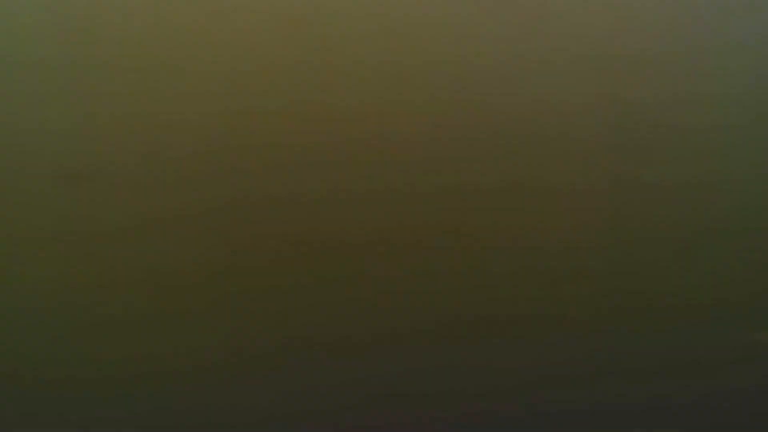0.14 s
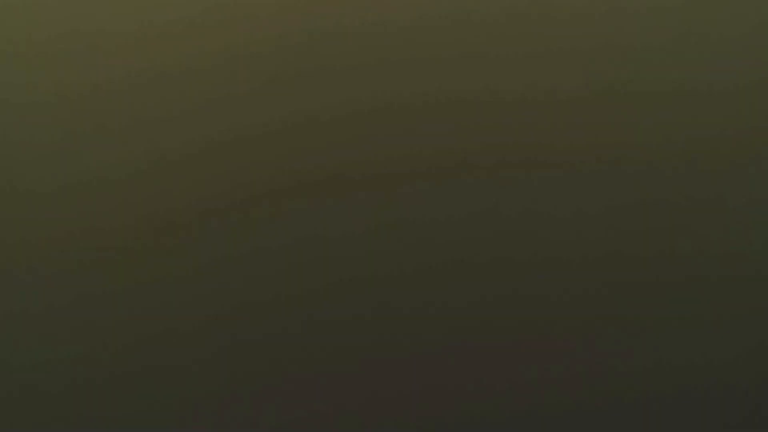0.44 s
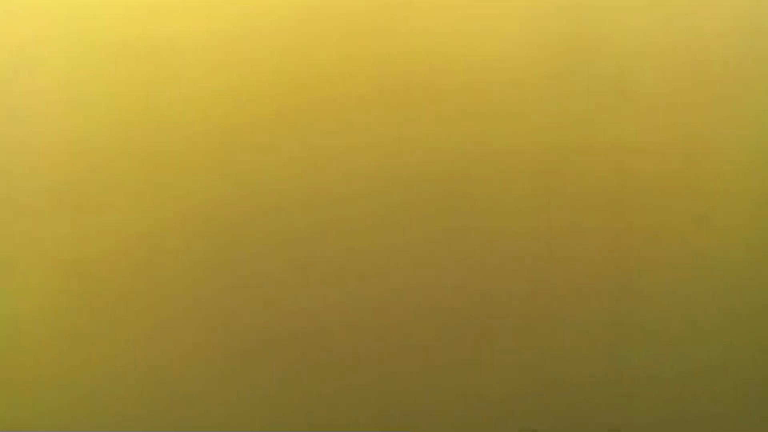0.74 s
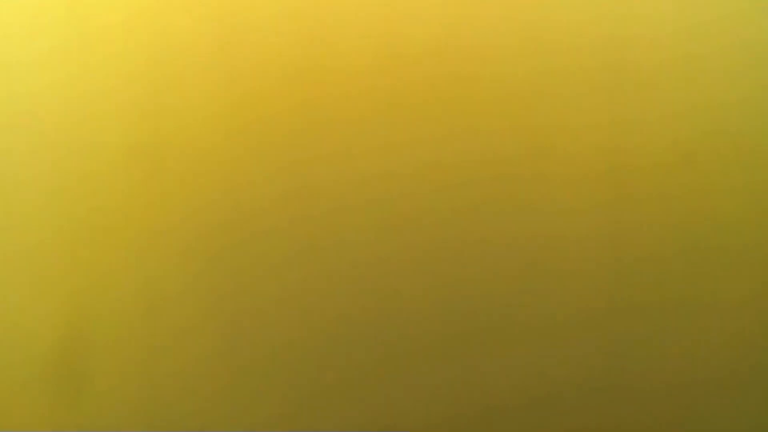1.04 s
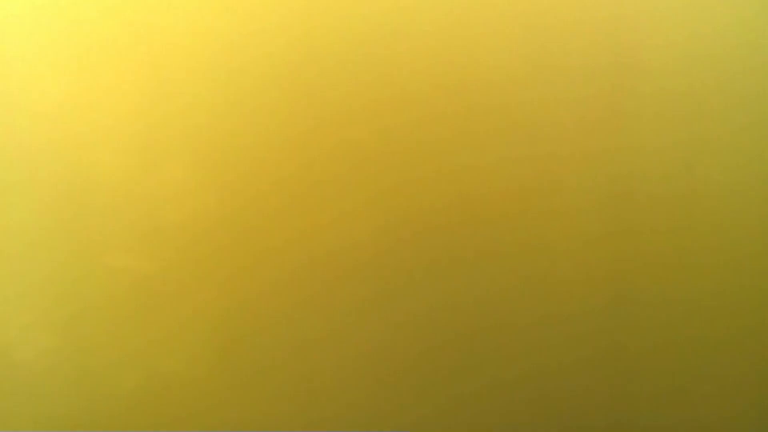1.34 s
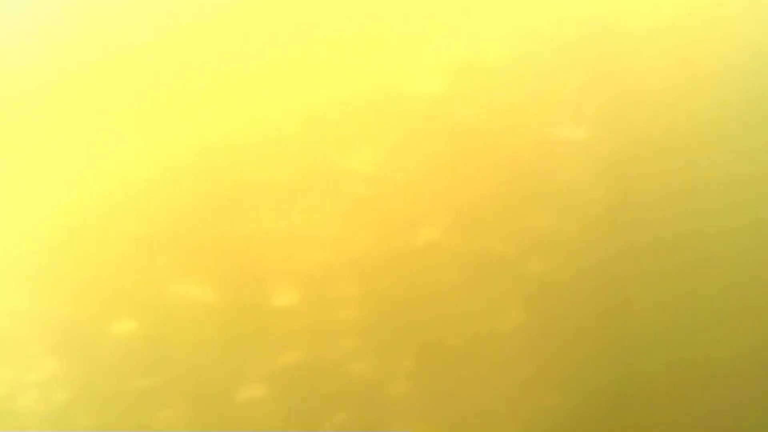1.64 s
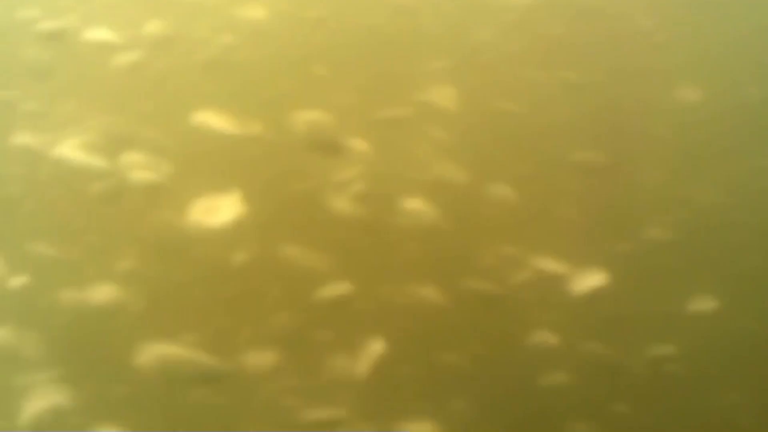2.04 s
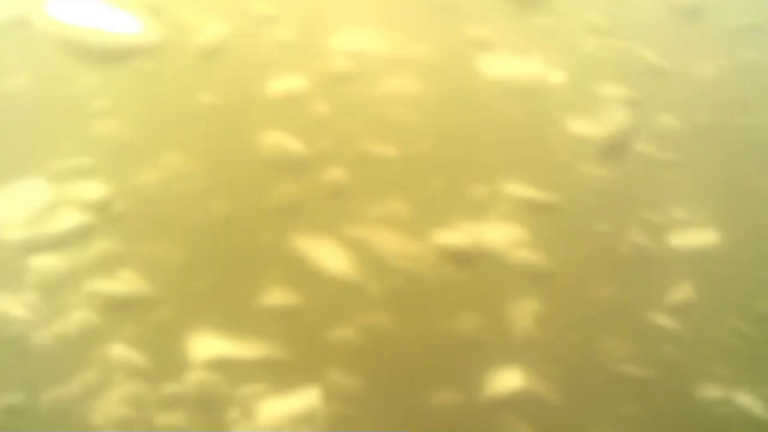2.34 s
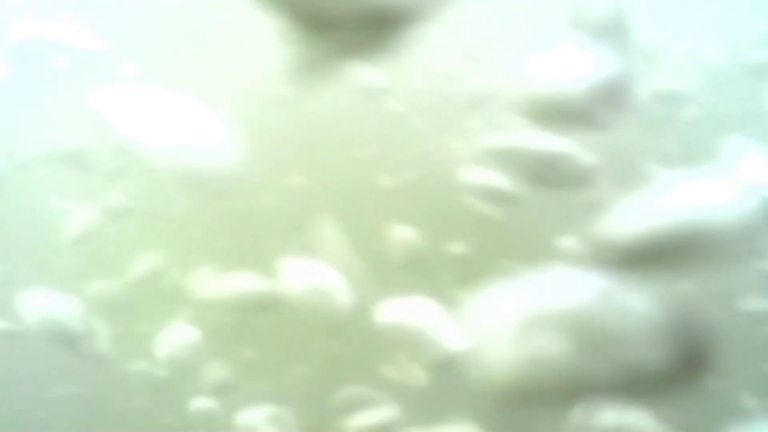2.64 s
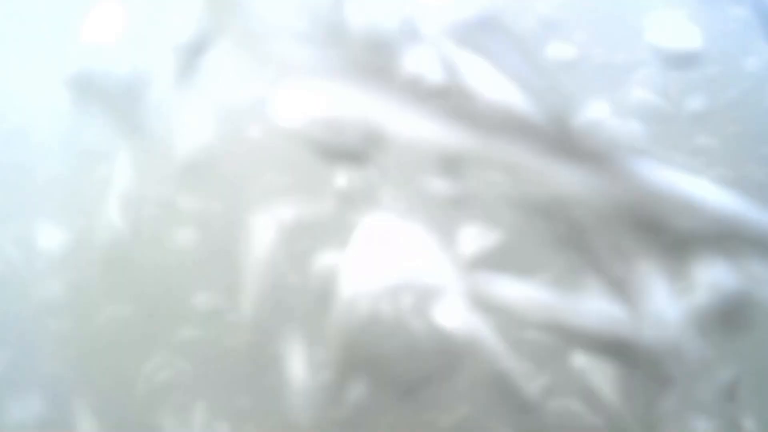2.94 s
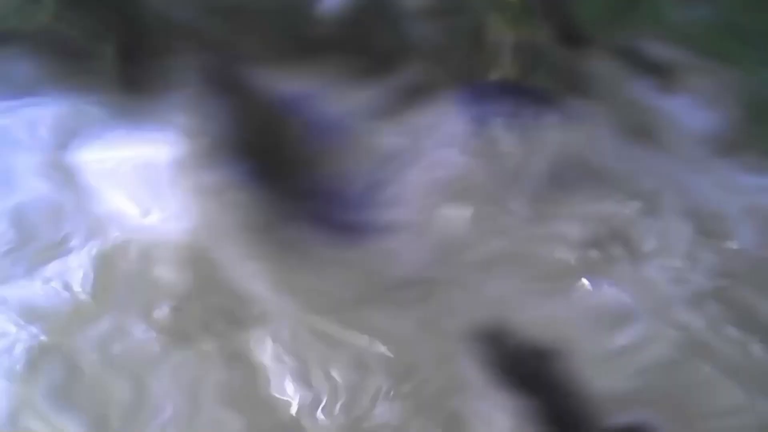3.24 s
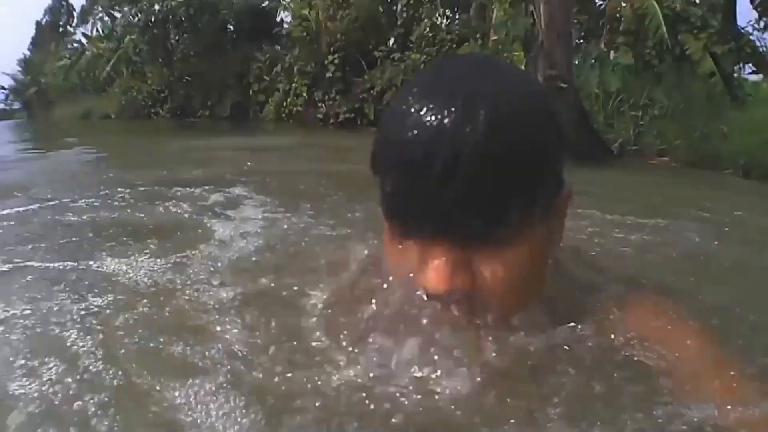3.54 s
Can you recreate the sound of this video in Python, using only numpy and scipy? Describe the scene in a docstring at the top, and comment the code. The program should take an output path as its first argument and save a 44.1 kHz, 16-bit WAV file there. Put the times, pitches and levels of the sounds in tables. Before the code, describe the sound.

A loud, distorted splash hits a waterproof camera as a swimmer plunges into a pond. Fizzing bubbles give way to muffled underwater churning and gurgles, then the microphone surfaces with a hollow glug, trickling water and plinking drops.

```python
"""Water slaps a waterproof camera case as a swimmer plunges into a pond, overloading the microphone.
A cloud of ringing bubbles fizzes out; below the surface come muffled churning and gulps of air.
Water wells up, the case surfaces with a hollow glug, and wavelets knock it. Drops tick on it and
ring the bubbles they trap while the water runs off. A faint hiss lies under it all."""
import sys
import numpy as np
from scipy import signal
from scipy.fft import rfft, irfft, next_fast_len
from scipy.io import wavfile

SR = 44100
rng = np.random.default_rng(int(sys.argv[2]) if len(sys.argv) > 2 else 0)


def store_wav(level_fs):
    """Save 16-bit WAV to argv[1]."""
    pcm = np.round(np.clip(np.atleast_2d(level_fs), -1, 1) * 32767)
    wavfile.write(sys.argv[1], SR, pcm.T.astype(np.int16))


N = 163170
TIME = np.arange(N) / SR
PLUNGE_S, GLUG_S, SURFACE_S = 0.082, 3.138, 3.19

# slaps of water, ahead of the case resonances: t/s, level/dB, length/s, centre f/Hz
SLAPS = [(0.0948, 5, .013, 1375), (.111, -10, 0.011, 1500), (.128, -2, 0.0041, 1050),
         (.143, -12, 0.0049, 1500), (.155, -8, .012, 800), (.197, -5, .014, 2100), (.204, -9.5, .011, 4200),
         (.216, -11, .016, 1200), (.232, -18, .014, 2800), (0.257, -13, 0.0015, 2500),
         (0.289, -12.5, 0.0043, 1100), (.332, -3.5, 0.0064, 884), (.351, -12.5, 0.0037, 1280),
         (.367, -12.5, 0.016, 660), (.403, -9.5, .008, 700), (0.455, -12, 0.0055, 1200),
         (.472, -6, 0.0026, 1460), (.490, -9, 0.0055, 1300)]
# the rush of water shoves the case: t/s, level/dB, length/s, f/Hz
SURGES = [(0.0868, 6.5, .028, 84.5), (0.101, -12, 0.15, 25.7), (0.282, -3.5, 0.08, 34.3),
          (.297, 8.5, .06, 126.8), (.39, -5, 0.056, 258.3)]
# resonances of the hollow case: f/Hz, width/Hz, gain/dB
CASE_MODES = [(840, 86, -0.5), (2000, 300, -9)]
# the churning ebbs as the case drifts upward: t/s, gain/dB
EBB = [(1.78, 0.5), (1.85, -2.5), (2.45, -2.5), (2.56, -4.5), (2.8, -1)]
# large pockets of air: t/s, level/dB, f/Hz
GULPS = [(.455, -11, 135), (0.548, -15, 107.6), (.675, -9, 340.6), (.815, -18.5, 178.6),
         (0.818, -14, 311.6), (1.435, -13.5, 342), (1.738, -17, 499), (1.743, -24.5, 160.4),
         (1.907, -18.5, 168), (2.168, -16.5, 294), (2.171, -25.5, 89), (2.241, -16.5, 309),
         (2.271, -17, 258.4), (2.275, -18, 172), (2.281, -25, 89.8), (2.421, -21.5, 191),
         (2.637, -21.5, 257.5), (2.643, -26, 133), (2.857, -20.5, 459), (2.882, -17, 522)]
# the case rings as it breaks the surface: f/Hz, level/dB, t60/s
GLUG_MODES = [(590.4, -3.5, 0.13), (175.6, -12.5, 0.4)]
# wavelets knock the case: t/s, level/dB, length/s, f/Hz
KNOCKS = [(3.497, 2, 0.0039, 520), (3.604, -10, 0.0024, 603), (3.612, -13, 0.00245, 716)]
# drops and small bubbles at the case: t/s, level/dB, f/Hz, t60/s
DROPS = [(.066, -14.5, 1340, 0.013), (.129, -1, 885, .03), (.157, -2.5, 819, 0.032), (.179, -9, 4160, .01),
         (.224, -4, 790, .04), (.258, -7.5, 867, 0.023), (.267, -8.5, 3170, 0.011),
         (.372, -6.5, 809, 0.039), (.415, -10.5, 4440, 0.0087), (.429, -2.5, 757, 0.028),
         (.447, -14.5, 4420, 0.0092), (.533, -25, 4100, .01), (.533, -14.5, 890, 0.027),
         (.552, -26, 4010, .014), (.678, -26.5, 1780, .02), (.718, -20, 2050, 0.023),
         (.762, -25.5, 1590, 0.026), (.793, -28, 1655, .03), (.834, -32.5, 3980, .012),
         (.905, -24, 1403, 0.032), (1.683, -43.5, 4200, .012), (1.915, -44, 4350, .012),
         (2.949, -33.5, 1640, 0.019), (3.077, -19, 566, 0.047), (3.104, -12.5, 3168, 0.015),
         (3.145, -19, 1720, 0.024), (3.178, -16, 2140, 0.029), (3.178, -19, 4030, 0.011),
         (3.209, -12.5, 1700, 0.023), (3.241, -16, 3680, .014), (3.249, -14, 3800, .015),
         (3.252, -8, 1928, .028), (3.272, -15, 788, .05), (3.368, 1, 1934, 0.021),
         (3.395, -13, 2000, 0.029), (3.394, -16.5, 3000, .018), (3.406, -10.5, 1970, .028),
         (3.431, -24, 4600, .014), (3.464, -8, 2340, 0.015), (3.469, 4.5, 3850, .011),
         (3.48, -7.5, 2350, 0.013), (3.492, -12, 3300, 0.011), (3.498, -7.5, 1140, .03),
         (3.512, -15, 6200, 0.012), (3.518, -6.5, 677, .018), (3.559, -11, 3930, .018),
         (3.575, -24, 6460, .008), (3.604, -1, 1695, .012), (3.6134, -3.5, 4030, .012),
         (3.62, -13.5, 2670, 0.013), (3.642, -24, 910, 0.079), (3.679, -23, 1100, .025),
         (3.691, -21.5, 4100, 0.017)]
# water running off at the surface: t/s, level/dB
RUNOFF_LEVEL = [(2.85, -62), (3.0, -44), (3.15, -40), (3.26, -25), (3.32, -40.5), (3.37, -23.5),
                (3.44, -25), (3.51, -18), (3.55, -24), (3.62, -27), (3.665, -38), (3.7, -33)]
# EQ curves of the bubble beds and the hiss: f/Hz, relative level/dB
CLOUD_TONE = [(400, -4), (700, 1.5), (850, 8), (1100, -5), (1450, -.5), (2080, 1), (2450, -17)]
SPRAY_TONE = [(2300, 0), (3100, 4.5), (3700, 1.5), (4500, 0), (5400, -11), (7000, -17)]
RUMBLE_TONE = [(20, -9), (40, -9.5), (70, -1), (115, 3.5), (180, 4.5), (260, -9)]
BURBLE_TONE = [(220, -2.5), (320, 2), (450, 2), (570, 2), (650, -9), (720, -3.5), (850, -16.5), (1000, -32),
               (1600, -29), (2100, -40)]
RUNOFF_TONE = [(400, -2), (850, 11.5), (1350, -5), (2050, 2.5), (2700, -12), (4200, -19), (5400, -26.5),
               (7000, -30)]
UPWELL_TONE = [(180, -5.5), (300, -4.5), (480, 0), (620, 0.5), (800, -4), (1000, -13)]
HISS_TONE = [(30, 8.5), (800, 8), (2000, -2.5), (3200, -4.5), (4300, -4), (5500, -8.5), (7000, -10)]
# bed envelopes: level at the turn/dB, slope before it/(dB/s), turn t/s, thinning time/s, loss/(dB/decade)
CLOUD_FADE, SPRAY_FADE = (-16, 5, .49, .105, 44), (-30.5, -22, 0.4557, .085, 39)
RUMBLE_FADE, BURBLE_FADE = (-13.5, 50, .44, .1, 15.5), (-10, 65, 0.43, .03, 12)


def slaps(band_ratio=1.453, release_s=0.0013, splatter_db=-15):
    """Water smacks the case: hard bursts of band noise with a bright splatter on top."""
    out, t = np.zeros(N), TIME[:SR // 10]
    for s, db, length, hz in SLAPS:
        body = band_noise(hz, band_ratio, len(t), order=2)
        splatter = from_db(splatter_db) * rng.standard_normal(len(t))
        envelope = np.exp(-np.maximum(t - length, 0) / release_s)
        add(out, s, from_db(db) * (body + splatter) * envelope)
    return out


def shoves(rows, wobble_cycles=0.31):
    """Swells of water pressure swing unevenly against the case: long ones thud, short ones knock."""
    out = np.zeros(N)
    for s, db, length, hz in rows:
        progress = np.linspace(0, 1, int(length * SR))
        drift = np.interp(progress, np.linspace(0, 1, 9), rng.standard_normal(9))
        cycles = (hz * length + wobble_cycles * drift) * progress
        swell = np.sin(np.pi * progress ** 0.86)
        add(out, s, from_db(db) * swell * np.sin(2 * np.pi * cycles))
    return out


def hollow_case(x):
    """The hollow case adds its resonances to a hit."""
    return x + sum(from_db(db) * signal.lfilter(*signal.iirpeak(hz, hz / width, fs=SR), x)
                   for hz, width, db in CASE_MODES)


def fizz():
    """The plunge leaves a cloud of small bubbles with a finer spray above it."""
    cloud = bubble_bed(CLOUD_TONE, per_s=1500, spread_db=5, cycles=19, wash_db=-3.5)
    spray = bubble_bed(SPRAY_TONE, per_s=900, spread_db=4.5, cycles=23, wash_db=-4)
    return thinning(*CLOUD_FADE) * cloud + thinning(*SPRAY_FADE) * spray


def bubble_bed(tone, per_s, spread_db, cycles, wash_db, bands=24):
    """Random bubbles, each dying 60 dB in `cycles` swings, over a wash of blurred ones; rms 1."""
    strengths = from_db(spread_db * np.minimum(rng.exponential(1, N), 3.5)) * rng.choice([-1, 1], N)
    kicks = strengths * (rng.random(N) < per_s / SR)
    band_of_kick = rng.integers(0, bands, N)
    rings = np.zeros(N)
    for band, hz in enumerate(np.geomspace(tone[0][0], tone[-1][0], bands)):
        radius, angle = from_db(-60 * hz / (cycles * SR)), 2 * np.pi * hz / SR
        drive = kicks * (band_of_kick == band) + 1e-18 * strengths  # tiny floor avoids underflow
        rings += hz * signal.lfilter([1, 0, -1], [1, -2 * radius * np.cos(angle), radius ** 2], drive)
    wash = from_db(wash_db) * colour(rng.standard_normal(N), tone)
    return rms_one(colour(rings, tone) + wash)


def thinning(db, slope_db_per_s, turn_s, thinning_s, decade_db):
    """Gain of a bubble cloud: sudden start, steady swell or sag, then a power-law fade."""
    swell_db = slope_db_per_s * np.minimum(TIME - turn_s, 0)
    loss_db = decade_db * np.log10(1 + np.maximum(TIME - turn_s, 0) / thinning_s)
    return (TIME > PLUNGE_S) * from_db(db + swell_db - loss_db)


def churning():
    """Big bubbles make a muffled rumble and burble that ebb as the case drifts upward."""
    rumble = bubble_bed(RUMBLE_TONE, per_s=260, spread_db=3, cycles=12, wash_db=-2.5)
    burble = bubble_bed(BURBLE_TONE, per_s=500, spread_db=2, cycles=14, wash_db=-6)
    ebb = from_db(np.interp(TIME, *np.transpose(EBB)))
    return (thinning(*RUMBLE_FADE) * rumble + thinning(*BURBLE_FADE) * burble) * ebb * draining()


def draining(db_per_s=28):
    """Gain that lets the bubbling die once the case is out of the water."""
    return from_db(-db_per_s * np.maximum(TIME - SURFACE_S, 0))


def gulps(gap_s=.018, step_db=-3, scatter_octaves=.27):
    """Each pocket of air breaks into a gurgle of three bubbles; the lower ones ring longer."""
    out = np.zeros(N)
    for s, db, hz in GULPS:
        for k, (late, detune) in enumerate(rng.uniform(-0.993, 1, (3, 2))):
            pitch = hz * 2 ** (scatter_octaves * detune) if k else hz
            t60 = 0.14 * (300 / pitch) ** 0.72
            ring = bubble(pitch, t60, swell_cycles=0.7, rise=0.027, rough=0.62)
            add(out, s + gap_s * k * (1 + late / 2), from_db(db + step_db * k) * ring)
    return out


def bubble(hz, t60, swell_cycles, rise, rough, knots=26):
    """A bubble swells, rings and dies, gliding up by the share `rise` per t60; its wobble adds grit."""
    t = np.arange(int(1.5 * t60 * SR)) / SR
    envelope = (1 - np.exp(-(t * hz / swell_cycles) ** 2)) * from_db(-60 * t / t60)
    wobble_points = rng.standard_normal(knots) + 1j * rng.standard_normal(knots)
    wobble = np.interp(t, np.linspace(0, t[-1], knots), wobble_points)
    phase = 2 * np.pi * hz * t * (1 + rise * t / t60 / 2)
    ring = (1 + rough * wobble) / np.sqrt(1 + rough ** 2) * np.exp(1j * phase)
    return envelope / envelope.max() * ring.imag


def glug():
    """The case breaks the surface and rings with a hollow glug."""
    out = np.zeros(N)
    for hz, db, t60 in GLUG_MODES:
        add(out, GLUG_S, from_db(db) * bubble(hz, t60, swell_cycles=1.4, rise=0.011, rough=.15))
    return out


def drops(tick_db=-15.5, tick_s=.0015):
    """Each drop is a short tick and the plink of the bubble that it traps."""
    out, t = np.zeros(N), TIME[:SR // 20]
    ticks = [band_noise(hz, 2, len(t), order=1) * np.exp(-t / tick_s) for _, _, hz, _ in DROPS]
    for (s, db, hz, t60), tick in zip(DROPS, ticks):
        add(out, s, from_db(db + tick_db) * tick)
        add(out, s, from_db(db) * bubble(hz, t60, swell_cycles=1.2, rise=0.037, rough=0.49))
    return out


def upwelling(crest_s=2.89, crest_db=-27, rise_db_per_s=70, fall_db_per_s=12):
    """Bubbling swells as the case nears the surface and drains away above it."""
    t = TIME - crest_s
    swell = from_db(crest_db + np.minimum(rise_db_per_s * t, -fall_db_per_s * t))
    return swell * draining() * bubble_bed(UPWELL_TONE, per_s=550, spread_db=3.5, cycles=12, wash_db=-5)


def runoff(fade_in_db_per_s=4000):
    """Water laps and runs off the case in a trickle of small bubbles."""
    times, levels = np.transpose(RUNOFF_LEVEL)
    fade_in_db = np.minimum(fade_in_db_per_s * np.maximum(times[0] - TIME, 0), 120)
    gain = from_db(np.interp(TIME, times, levels) - fade_in_db)
    return gain * bubble_bed(RUNOFF_TONE, per_s=1500, spread_db=6.5, cycles=20, wash_db=-8)


def hiss(floor_db=-53, open_air_db=-36):
    """Microphone hiss, louder in the open air before the plunge."""
    floor = from_db(floor_db) * colour(rng.standard_normal(N), HISS_TONE)
    open_air = from_db(open_air_db) * colour(rng.standard_normal(N), HISS_TONE)
    return floor + open_air * (TIME < PLUNGE_S)


def band_noise(hz, ratio, samples, order):
    """Noise from hz / ratio up to hz * ratio, the upper edge capped at SR / 3; rms 1."""
    band = signal.butter(order, [hz / ratio, min(hz * ratio, SR / 3)], "band", fs=SR, output="sos")
    return rms_one(signal.sosfilt(band, rng.standard_normal(samples)))


def colour(x, tone, skirt_db_per_octave=45):
    """Minimum-phase EQ through (f/Hz, level/dB) points, with two-octave skirts; rms 1."""
    size = 2 * next_fast_len(N // 2 + SR // 4)
    octave = np.log2(np.maximum(np.arange(size // 2 + 1) * SR / size, 1))
    hz, db = np.transpose(tone)
    beyond = np.abs(octave - np.clip(octave, np.log2(hz[0]), np.log2(hz[-1])))
    curve_db = np.interp(octave, np.log2(hz), db) - skirt_db_per_octave * np.minimum(beyond, 2)
    cepstrum = irfft(np.log(from_db(curve_db)))
    response = np.exp(rfft(2 * cepstrum[:size // 2], size))
    return rms_one(irfft(rfft(x, size) * response)[:N])


def from_db(db):
    """Decibels to gain."""
    return 10 ** (np.asarray(db) / 20)


def rms_one(x):
    """Scale to unit power."""
    return x / np.sqrt(np.mean(x ** 2) + 1e-20)


def add(out, s, sound):
    """Mix a sound in at s seconds."""
    start = int(s * SR)
    out[start:start + len(sound)] += sound[:max(N - start, 0)]


def scene():
    """The plunge, the churn below and the surfacing, mixed in mono over the hiss."""
    background = hiss()
    plunge = hollow_case(slaps() + shoves(SURGES)) + fizz()
    underwater = churning() + gulps() + upwelling()
    surfacing = runoff() + glug() + shoves(KNOCKS) + drops()
    return (plunge + underwater + surfacing + background)[None]


def record(dry, mic_top_hz=6670, ceiling=0.88, hiss_db=-75.5, sag_hz=8, stopband_hz=16600):
    """A narrow-band microphone overloads hard; faint hiss joins, flat tops sag and the top is cut."""
    narrow = signal.sosfilt(signal.ellip(8, .5, 70, mic_top_hz, fs=SR, output="sos"), dry)
    clipped = np.clip(narrow, -ceiling, ceiling) + from_db(hiss_db) * rng.standard_normal(N)
    sagged = signal.sosfilt(signal.butter(1, sag_hz, "high", fs=SR, output="sos"), clipped)
    return signal.sosfilt(signal.cheby2(16, 80, stopband_hz, fs=SR, output="sos"), sagged)


dry = scene()
out = record(dry)
store_wav(out)
```